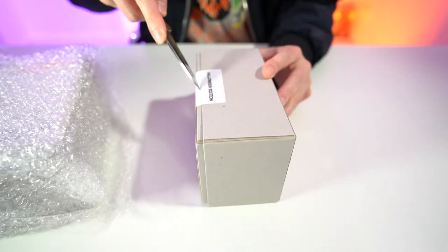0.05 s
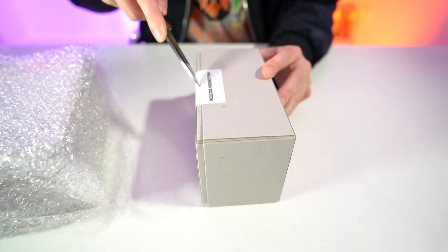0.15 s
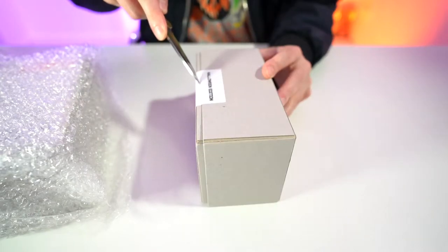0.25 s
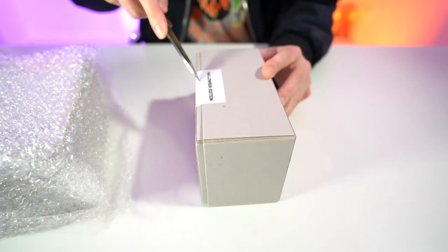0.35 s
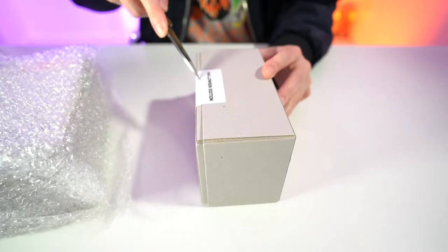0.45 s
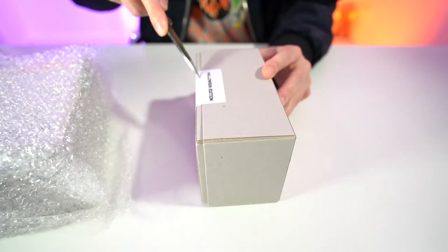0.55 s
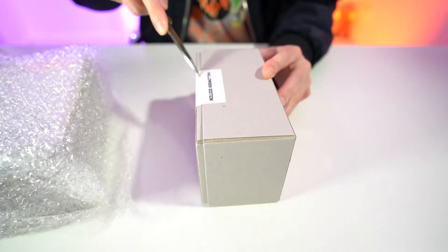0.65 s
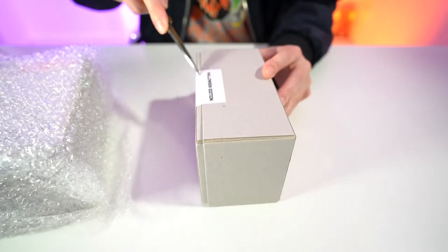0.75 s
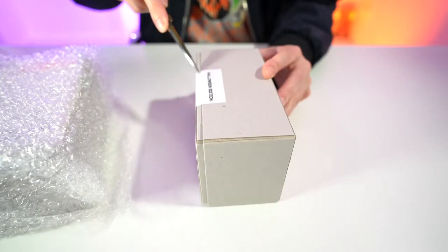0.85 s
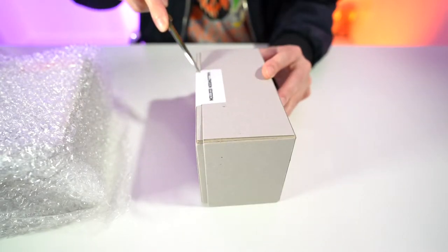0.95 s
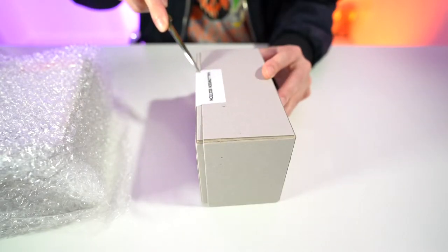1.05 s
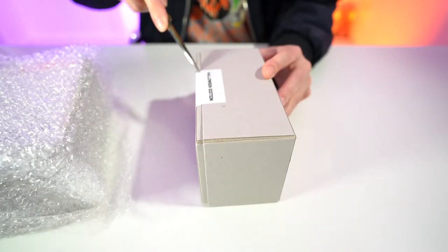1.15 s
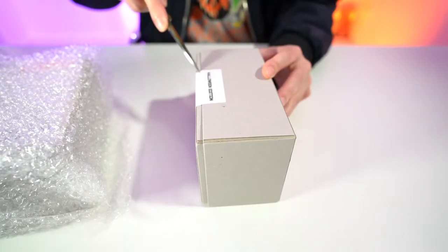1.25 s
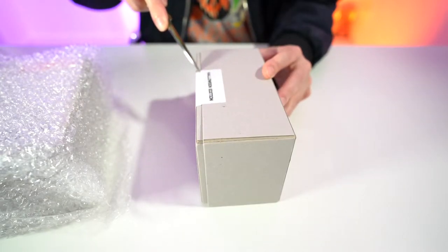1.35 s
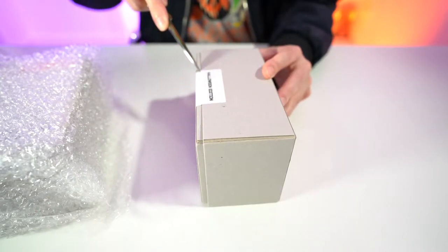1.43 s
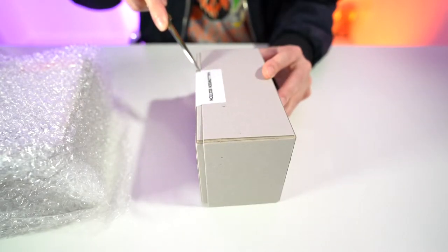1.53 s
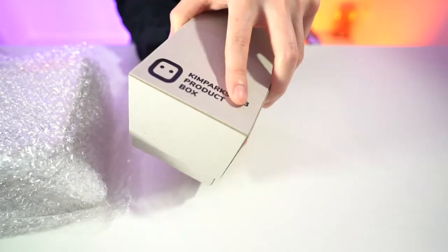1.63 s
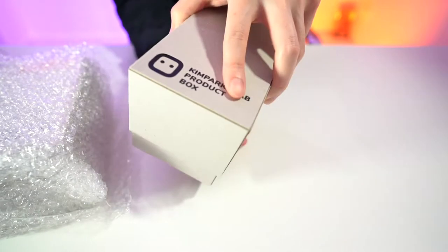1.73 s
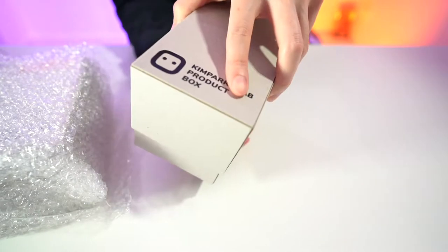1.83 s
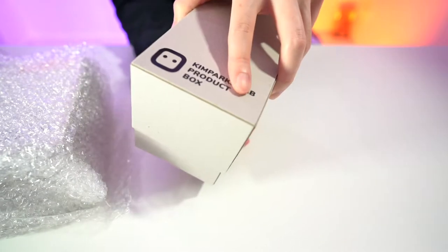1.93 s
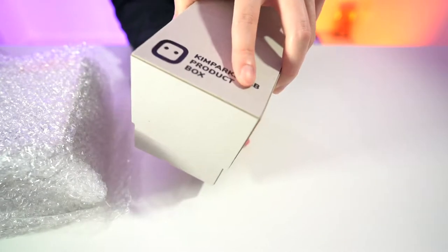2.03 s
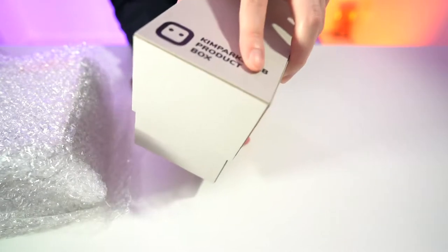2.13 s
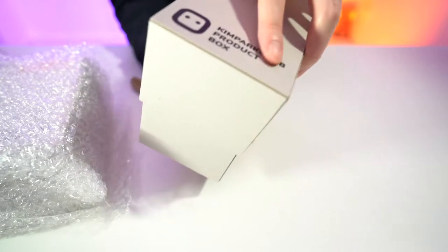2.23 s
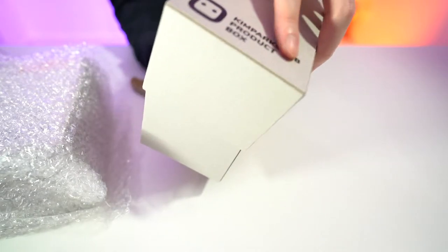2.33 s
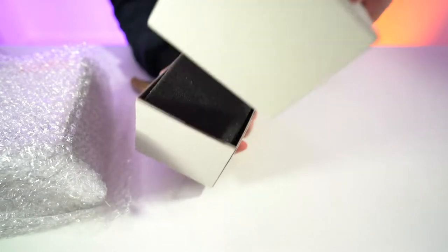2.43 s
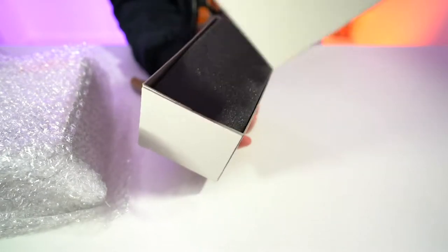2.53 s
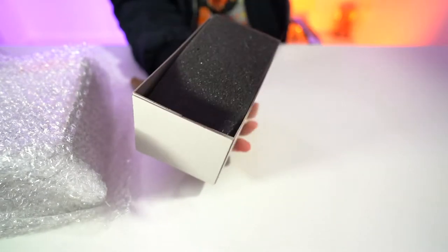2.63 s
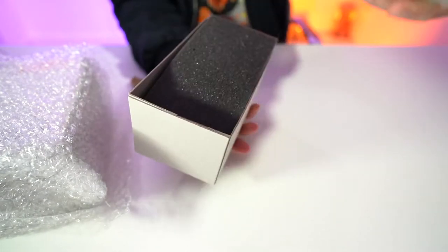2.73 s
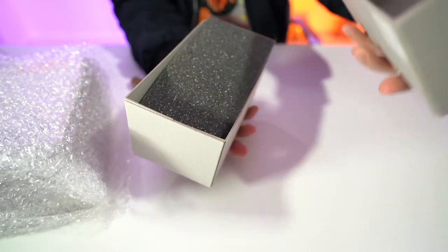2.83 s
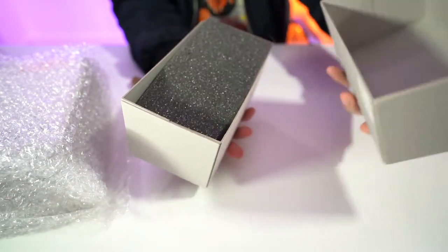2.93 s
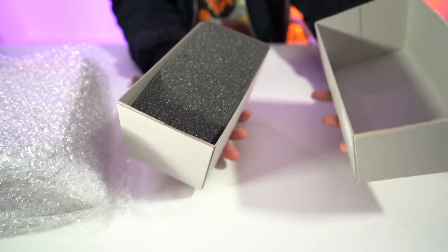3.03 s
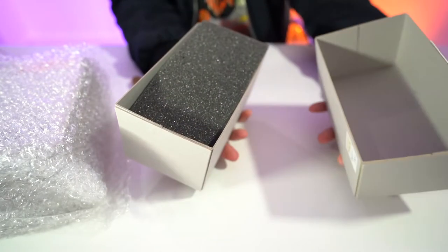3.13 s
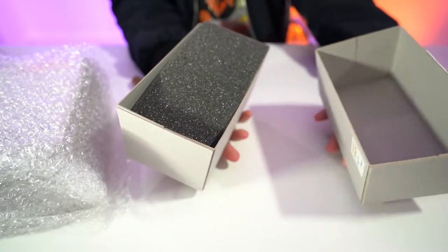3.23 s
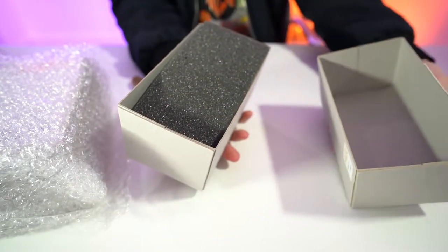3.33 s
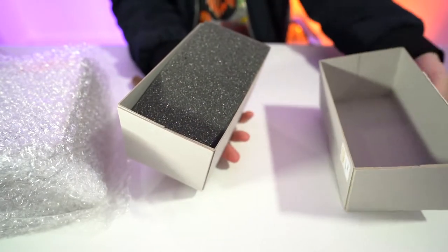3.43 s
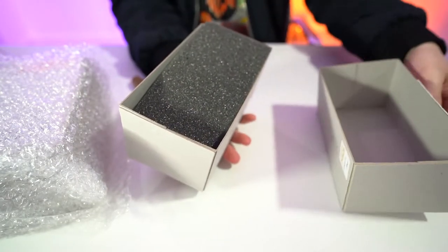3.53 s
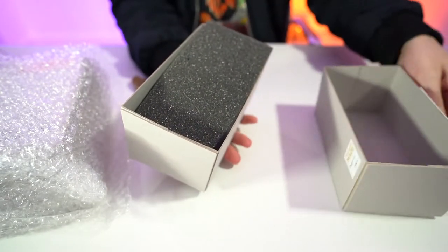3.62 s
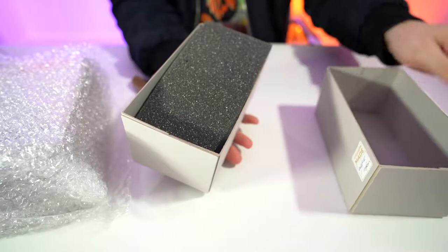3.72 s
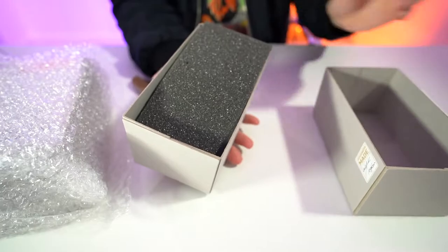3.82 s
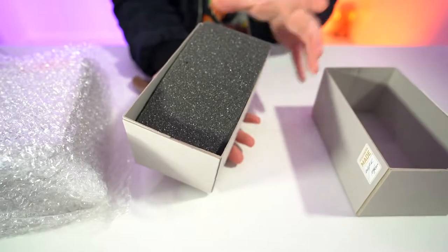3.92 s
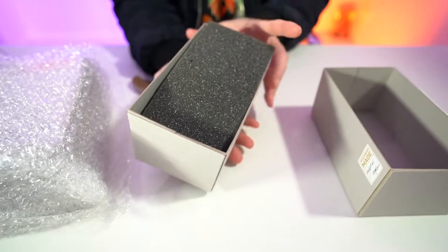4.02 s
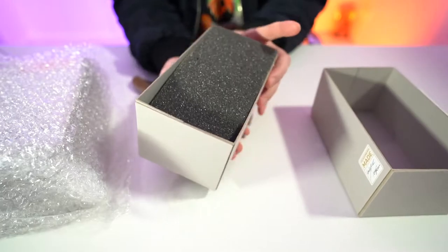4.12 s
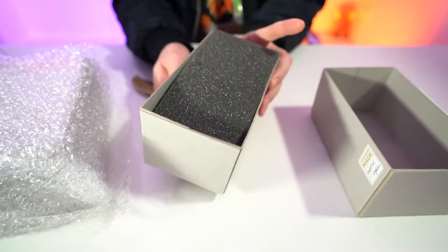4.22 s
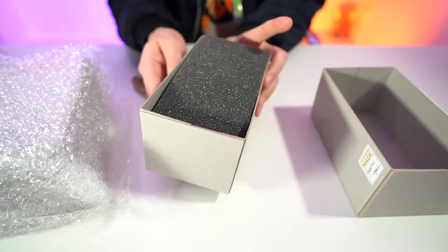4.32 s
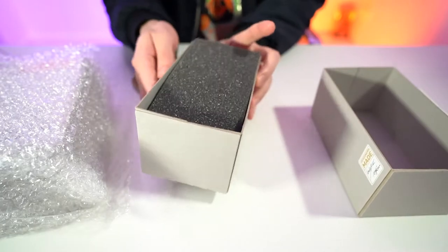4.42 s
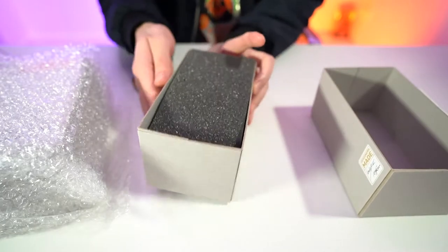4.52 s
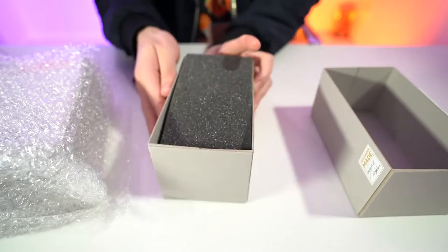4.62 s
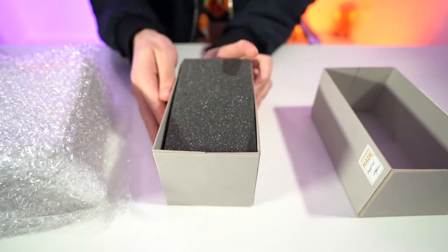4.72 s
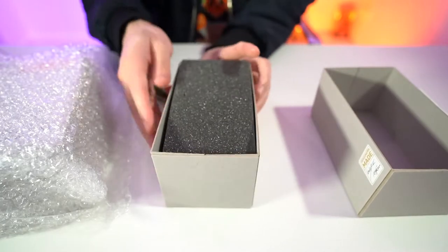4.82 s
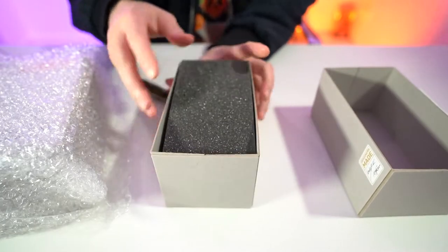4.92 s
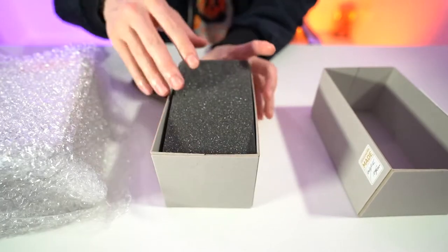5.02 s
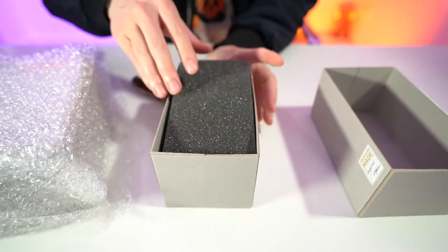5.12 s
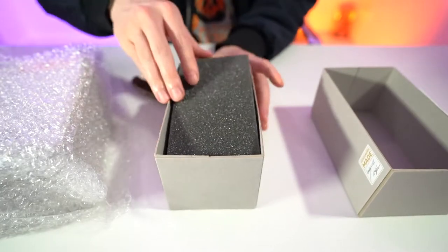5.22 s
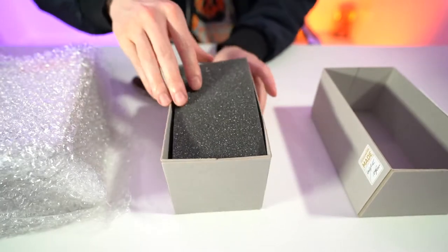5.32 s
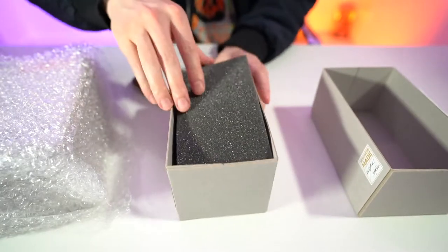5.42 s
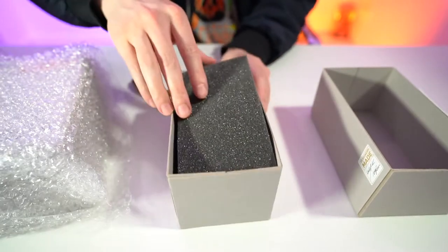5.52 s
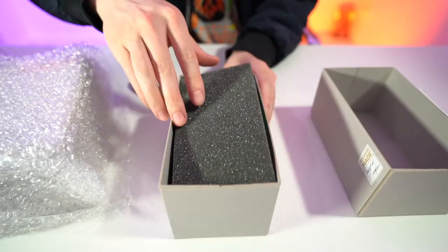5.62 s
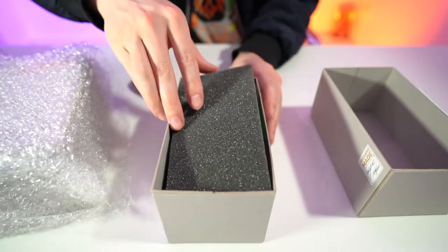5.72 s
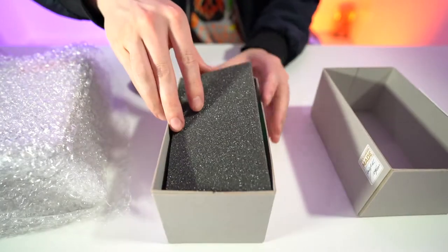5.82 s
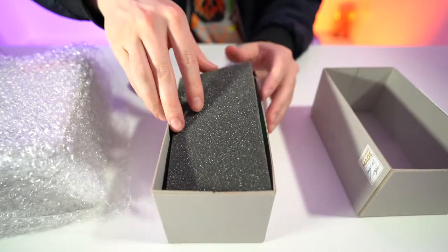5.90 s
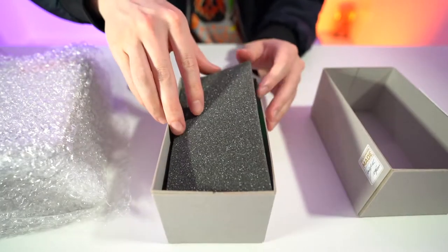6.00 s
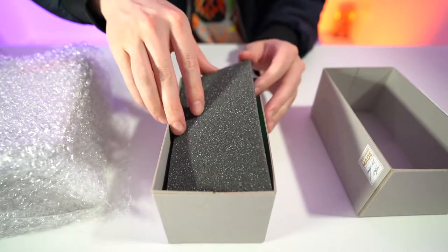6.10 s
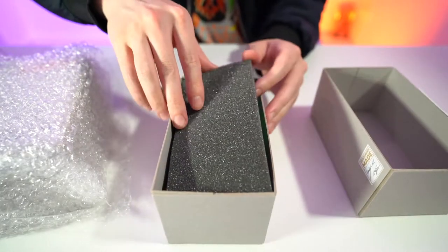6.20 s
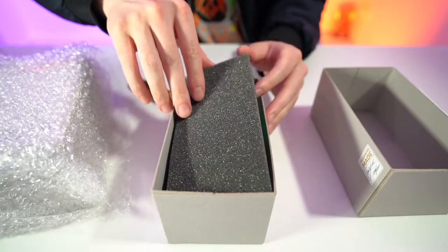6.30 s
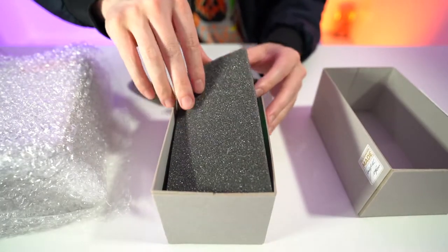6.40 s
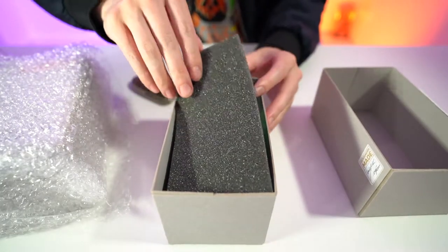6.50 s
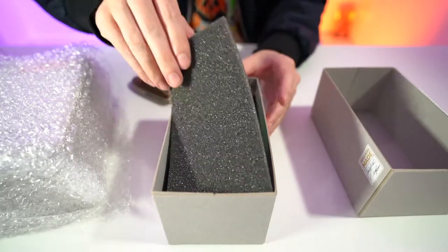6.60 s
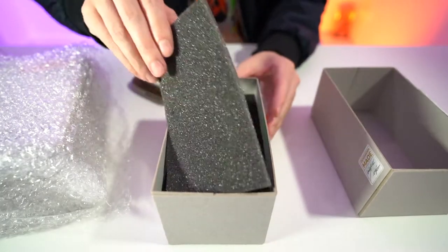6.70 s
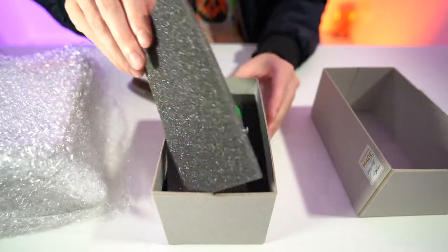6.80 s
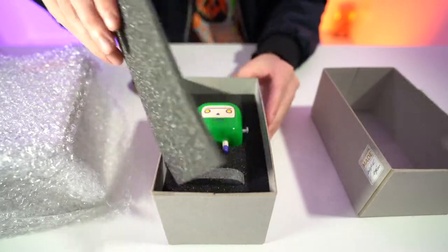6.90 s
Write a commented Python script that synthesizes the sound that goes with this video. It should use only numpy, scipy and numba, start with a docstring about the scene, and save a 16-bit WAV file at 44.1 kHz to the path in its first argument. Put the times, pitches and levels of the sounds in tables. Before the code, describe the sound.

Close indoor unboxing: faint crisp paper tearing, hollow lid scrape, bouncing cardboard knocks, box thud, soft finger strokes and gritty foam rubbing.

```python
"""First a blade slits a paper seal: uneven bursts of tiny slips, with ringing notes and sharp snaps.
Then the tight lid of a small cardboard box slides off and is set down with a few bounces; the box is put down.
Fingers and a foam sheet rub the walls: streams of random slips, split into pitch bands, shake the card.
Knocks are fading sine waves at the card's own notes, creaks are narrow bands of noise.
Under it all lie faint room noise and slow air pressure that rocks the capsule below hearing."""
import sys
import numpy as np
from scipy import signal
from scipy.fft import rfft, irfft, next_fast_len
from scipy.io import wavfile
from scipy.ndimage import uniform_filter1d
from numba import njit

SR = 44100
rng = np.random.default_rng(int(sys.argv[2]) if len(sys.argv) > 2 else 0)


def unload_wav(signal):
    """Save mono or channel-first audio to the path in sys.argv[1] as 16-bit WAV at rate SR, clipped to [-1, 1]."""
    wavfile.write(
        sys.argv[1],
        SR,
        np.round(np.clip(np.atleast_2d(signal).T, -1, 1) * 32767).astype(np.int16),
    )


def voltage_ratio(level):
    """Linear amplitude factor for a level in decibels (scalar or array-like)."""
    return 10 ** (np.asarray(level, float) / 20)


N = 306698
TIME = np.arange(N) / SR


def columns(table):
    """A soft gate, open within the table's time span, and each column drawn out to every sample."""
    s, *rest = np.transpose(table)
    inside = uniform_filter1d(1. * (TIME >= s[0]) * (TIME <= s[-1]), size=400)
    return inside, [np.interp(TIME, s, c) for c in rest]


def unit(x):
    """Scale to an rms of 1."""
    return x / np.sqrt(np.mean(x ** 2))


def colour(x, table):
    """Filter by (f/Hz, level/dB) points joined by straight lines on a log frequency axis."""
    size = next_fast_len(len(x))
    hz, db = np.transpose(table)
    at = np.log(np.maximum(np.arange(size // 2 + 1) * SR / size, 1))
    gain = voltage_ratio(np.interp(at, np.log(hz), db))
    return irfft(rfft(x, size) * gain, size)[:len(x)]


@njit
def svf(x, hz, width, sr):
    """Band-pass whose centre may move, with a gain of 1 there."""
    y, b, l = np.empty(len(x)), 0., 0.
    for i in range(len(x)):
        g, k = np.tan(np.pi * hz[i] / sr), width / hz[i]
        v = (b + g * (x[i] - l)) / (1 + g * (g + k))
        b, l, y[i] = 2 * v - b, l + 2 * g * v, k * v
    return y


def band(x, hz, width_hz):
    """Band-pass at a fixed or moving centre."""
    return svf(x, hz + np.zeros(len(x)), 1. * width_hz, 1. * SR)


def walk(rate):
    """A smooth random wander: levels held 1 / rate s, then averaged twice; spread near 1."""
    hold = int(SR / rate)
    steps = np.repeat(rng.standard_normal(N // 50), hold)[:N]
    return 1.17 * uniform_filter1d(uniform_filter1d(steps, hold), hold)


def grains(rate, spread_db):
    """Tiny slips at random moments, rate per second, most small and a few large."""
    chance = rng.random((3, N))
    size = voltage_ratio(-spread_db * np.log(1 - chance[1])) * np.sign(chance[2] - .5)
    return unit((chance[0] < rate / SR) * np.minimum(size, 6.))


def add(out, s, x):
    """Mix x into out from second s on."""
    i = int(s * SR)
    out[i:i + len(x)] += x[:N - i]


def drone(force, modes, widen):
    """Steady friction shakes the card's modes; the pressing hand sets how wide they are."""
    return unit(sum(voltage_ratio(db) * band(force, hz, widen * 1.34 / t60) * np.sqrt(t60) for hz, db, t60 in modes))


# pull of the blade through the seal: columns [t/s, level/dB]
BLADE_PULL = [(0.0, -56), (0.09, -51.5), (0.228, -52), (0.434, -53), (0.454, -58.5), (0.528, -51.5),
              (0.562, -59.5), (0.688, -55.5), (0.935, -56), (0.955, -64), (1.0, -71)]
# the blade's ring climbs as it digs in, then sags: columns [t/s, f/Hz]
BLADE_RING = [(0.0, 3800), (0.15, 3800), (0.43, 4340), (0.56, 4310), (1.0, 4130)]
# colour of tearing paper: columns [f/Hz, level/dB]
TEAR_COLOUR = [(700, -2), (1200, -3.5), (3000, -4), (6000, -4), (8300, 1.5), (10300, -7.5), (11500, -1),
               (13000, -2), (16000, -8)]
# single paper fibres and glue spots snapping: columns [t/s, level/dB at the start, before colouring]
SNAPS = [(0.021, -30), (0.17, -27), (0.282, -29.5), (0.4204, -26), (0.437, -41), (0.5328, -36),
         (0.5779, -34), (0.615, -35), (0.630, -37), (0.654, -35), (0.6966, -34), (0.732, -37),
         (0.7465, -32), (0.7905, -33), (0.901, -44), (0.917, -31), (0.938, -36.5), (1.0075, -41.5),
         (1.3044, -33.5), (1.359, -29.5), (1.367, -35), (1.3723, -33), (5.1736, -44), (5.193, -37)]
# modes of the box's card, also used for rubbing and knocks: columns [f/Hz, level/dB, time to fall 60 dB/s]
BOX_MODES = [(146, -45, 0.014), (194, -3.5, 0.054), (308, 8.5, 0.054), (353, 6, 0.15), (417, 1.4, 0.17),
             (445, -11, 0.42), (588, 14, 0.035), (669, -4.5, 0.3), (695, -12, 0.23), (844, -3.5, 0.15),
             (970.6, 0.5, 0.16), (1065, -15, 0.66), (1177, 8.5, 0.04), (1680, -20, 0.023)]
# what the shut lid lets out, also used for the lid's slide: columns [f/Hz, level/dB]
SHUT_LID = [(100, 15), (300, 7), (650, 5.5), (800, -6.5), (1200, -19.5)]


def slit():
    """Fibres tear in uneven bursts, single ones snap; blade and paper flap ring, the closed box drones."""
    inside, (cut_db,) = columns(BLADE_PULL)
    _, (ring_hz,) = columns(BLADE_RING)
    # the ring weakens steeply below its highest pitch
    ring_db = cut_db - 1 + 40 * np.log2(ring_hz / ring_hz.max())
    drone_db, flap_db, flap_hz = cut_db + 7, cut_db - 1.5, .45 * ring_hz
    bursts = voltage_ratio(2.6 * walk(90))
    fine = bursts * grains(7000, 2.)
    coarse = bursts * grains(1100, 2.8)
    tear = unit(colour(fine + voltage_ratio(-4) * coarse, TEAR_COLOUR)) * voltage_ratio(cut_db)
    ring = unit(band(coarse + voltage_ratio(-3) * fine, ring_hz, 260)) * voltage_ratio(ring_db)
    flap = unit(band(fine + voltage_ratio(-0.5) * coarse, flap_hz, 310)) * voltage_ratio(flap_db)
    # the shut lid lets mainly the low wall modes out
    body = unit(colour(drone(fine, BOX_MODES, 3.15), SHUT_LID)) * voltage_ratio(drone_db)
    jolts = np.zeros(N)
    # sixteen small snaps at random moments join the listed ones
    small_snaps = [(s, -37) for s in rng.uniform(0, .94, 16)]
    for s, snap_db in SNAPS + small_snaps:
        add(jolts, s, voltage_ratio(snap_db) * rng.standard_normal(200) * np.exp(-TIME[:200] / .0007))
    snaps = colour(jolts, TEAR_COLOUR) + voltage_ratio(2.5) * band(jolts, ring_hz, 770)
    return inside * (tear + ring + flap + body) + snaps


# slow air pressure at the capsule: columns [t/s, level/dB]
SWAY = [(0.0, -30), (1.05, -32.5), (1.3, -27), (1.68, -35.5), (2.24, -36.5), (2.5, -22), (3.44, -45),
        (3.6, -25), (3.87, -41.5), (4.78, -28), (5.19, -34.5), (6.95, -35)]
# colour of the still room: columns [f/Hz, relative level/dB per Hz]
ROOM = [(45, 10), (70, -2), (200, -11), (400, -16.5), (900, -14.5), (2500, -28.5), (8000, -27.5),
        (16000, -28.5)]


def air():
    """Slow pressure swings near 15 Hz, one gust as the lid comes free, and the faint noise of the room."""
    _, (sway_db,) = columns(SWAY)
    sway = colour(rng.standard_normal(N), [(2, -28), (6, -7), (15, 8.0), (19, -4.5), (28, -25.0),
                                           (50, -43), (200, -90)])
    # the swings keep a fairly even size
    swing_size = np.sqrt(uniform_filter1d(sway ** 2, SR // 8))
    sway = unit(sway / (swing_size + 0.33 * sway.std())) * voltage_ratio(sway_db)
    t = TIME[:SR // 2]
    gust_s, gust_db, gust_hz, gust_t60_s = 2.463, -17, 21, .4
    gust = np.sin(2 * np.pi * gust_hz * t) * (1 - np.exp(-t / 0.006)) * 1000. ** (-t / gust_t60_s)
    add(sway, gust_s, voltage_ratio(gust_db) * gust)
    room = unit(colour(rng.standard_normal(N), [(32, -73)] + ROOM))
    return sway + room * voltage_ratio(-58 + 0.55 * walk(3.42))


def strokes(rows, drone_db, hiss_db, lean):
    """Power of scrape, hiss and wall drone: each stroke starts fast, swells to its peak, sags and dies out."""
    sag_db, attack_s, release_s = 9, .004, .014
    out = np.zeros((3, N))
    for s, length, db, place, bright_db in rows:
        t = TIME[:int((length + 4 * release_s) * SR)]
        shape_db = np.interp(t / length, [0, np.clip(place, .02, .98), 1], [-sag_db, 0, -sag_db])
        fade = np.exp(-np.maximum(t - length, 0) / min(release_s, length / 2))
        edges = np.minimum(t / attack_s, 1) * fade
        # lean: drone lost per dB of brightness
        for layer, over_db in zip(out, (0, hiss_db + bright_db, drone_db - lean * bright_db)):
            add(layer, s, (edges * voltage_ratio(db + over_db + shape_db)) ** 2)
    return out


# the three stroke tables share columns [t/s, length/s, peak level/dB, place of the peak 0-1, brightness/dB]
# firm contacts that shake the walls: blade tip on the lid, hand gripping the lid, lid skidding, box settling
PRESSES = [(.95, 1, -66.5, .3, -9), (1.005, 0.013, -60, 0.22, -5), (1.297, 0.031, -64, 0.069, -11),
           (1.35, 0.046, -57, 0.24, -4), (1.56, .04, -60.5, 0.23, -3), (2.8, 0.33, -72, 0.92, -5),
           (3.335, 0.1, -49, 0.066, 5), (3.663, 0.06, -38, 0.26, -3), (3.7, .09, -52.5, 0.19, -19),
           (4.635, 0.11, -53, 0.13, -6)]
# fingers stroking the card
FINGERS = [(2.42, 0.13, -55, 0, 1.5), (2.54, 1, -56.5, 0.23, 1.5), (2.71, 0.082, -57.5, 0, 0),
           (2.82, 0.09, -55, 0.52, 3), (3.18, 0.041, -53.5, 0.4, 2), (3.25, 0.39, -49, 0.56, 4.5),
           (3.503, 0.045, -38.5, 0.65, -1), (3.56, 0.071, -45, 0.46, 7.5), (3.62, 0.65, -56, 0.3, -0.5),
           (3.71, 0.015, -46, .4, -1), (4.065, 0.31, -48.5, 0.34, 4.5), (4.295, 0.021, -46, 0.5, 5),
           (4.32, 0.4, -53.5, 0.65, 2), (4.62, 0.1, -50, 0.5, 2), (4.72, 0.13, -51, 0.7, -0.5),
           (4.88, .25, -56.5, 0.38, -3)]
# the foam sheet stroking the card
FOAM = [(5.168, 0.049, -54.5, .15, -1), (5.19, 0.4, -52.5, 0.47, -2), (5.385, 0.13, -52.5, .15, -12),
        (5.5, 0.22, -46.5, 0.58, 0.5), (5.69, 0.36, -57, 0.35, 5), (6.032, 0.081, -49, 0.076, -9),
        (6.08, .38, -51, .6, 1.5), (6.167, 0.22, -48, 0, 5.5), (6.452, 0.095, -45.5, 0.2, -6),
        (6.537, 0.043, -39.5, 0.33, -2), (6.572, 0.051, -51, 0.7, 3), (6.642, .14, -45, 0.72, -4.5),
        (6.775, 0.14, -44, 0.63, -7)]
# the tight lid slides off: columns [t/s, speed as scrape level/dB, grip as wall drone over scrape/dB]
LID_SLIDE = [(1.615, -78, 5), (1.634, -51.5, 9), (1.69, -45, 1.5), (1.8, -52, 8), (1.875, -55, 8),
             (1.9, -47.5, 7.5), (2.05, -42, -4), (2.2, -43, -1), (2.3, -40.5, -6.5), (2.405, -37.5, -3),
             (2.418, -54, 5), (2.45, -62, 10)]


def contact():
    """Levels in dB of scrape, hiss over scrape, wall drone and table rumble from all that touches the card."""
    inside, (speed_db, grip_db) = columns(LID_SLIDE)
    # a faster slide hisses more
    hiss_db = -5.5 + .5 * (speed_db - speed_db.max())
    power = inside * voltage_ratio([speed_db, speed_db + hiss_db, speed_db + grip_db]) ** 2
    power = power + strokes(FINGERS, drone_db=-18.5, hiss_db=-5, lean=0.16)
    power = power + strokes(FOAM, drone_db=-8, hiss_db=-5, lean=0.2)
    power = power + strokes(PRESSES, drone_db=6.7, hiss_db=-9.5, lean=0.47)
    # holding hands are never quite still
    held_db = -81.5
    scrape, hiss, walls = power + voltage_ratio([[held_db], [held_db - 20], [held_db + 14]]) ** 2
    rumble = walls * voltage_ratio(-5) ** 2 + voltage_ratio(-64) ** 2
    return 10 * np.log10([scrape, hiss / scrape, walls, rumble])


# modes of the lid's card, also used for its knocks: columns [f/Hz, level/dB, time to fall 60 dB/s]
LID_MODES = [(36.7, -16.5, 1), (104.1, -9.5, 0.42), (222, 6, 0.16), (295.3, 0.5, 0.23), (327, 2.5, 0.13),
             (394, 3, 0.25), (440.6, -5.5, 0.27), (479, 9, 0.063), (560, 9, 0.093), (682, -5.5, 0.25),
             (780, -13.5, 0.61), (906, 9.5, 0.04), (1090, -23, 0.033), (1244, -10, 0.18),
             (1490, -11, 0.083), (1800, -36, .08), (2340, -38, .12)]
# colour of scraping card: columns [f/Hz, level/dB per half octave]
CARD = [(64, -10.5), (180, -5.5), (350, -7), (600, -6), (1000, -8), (2000, -7.5), (4000, -9), (8000, -4),
        (11000, -17), (15000, -2.5)]


def rubbing():
    """Dense slips heard in half octaves; low ones follow table and walls, high ones the fine hiss."""
    scrape_db, hiss_db, drone_db, rumble_db = contact()
    force = voltage_ratio(1.6 * walk(30)) * grains(9000, 1.6)
    # the lid is in the hand between these times; before, it sits on the box
    lift_s, release_s = 2.45, 3.9
    held = (TIME > lift_s) * (TIME < release_s)
    shut_walls = voltage_ratio(-7) * unit(colour(drone(force, BOX_MODES, 2.1), SHUT_LID))
    walls = np.where(held, 0.16 * drone(force, LID_MODES[2:], 4.8), 0.25 * drone(force, BOX_MODES, 0.77))
    out = np.where(TIME < lift_s, shut_walls, walls) * voltage_ratio(drone_db)
    card_hz, card_db = np.transpose(CARD)
    step = np.sqrt(2)
    for hz in 64 * step ** np.arange(17):
        # how far this band follows the table, the walls and the hiss
        deep = np.clip(np.log2(230 / hz) / 0.25, 0, 1)
        low = np.clip(np.log2(1600 / hz) / 3.02, 0, 1) - deep
        high = np.clip(np.log2(hz / 4200) / 1.1, 0, 1.6)
        db = deep * rumble_db + low * drone_db + (1 - low - deep) * scrape_db + high * hiss_db
        part = colour(force, [(hz / 2, -60), (hz / step, -12), (hz, 0), (hz * step, -12), (hz * 2, -60)])
        flicker_db = 1.6 * walk(20)
        tone_db = np.interp(np.log(hz), np.log(card_hz), card_db)
        out = out + voltage_ratio(db + tone_db + flicker_db) * unit(part)
    # the foam sheet scrapes out of the box: its cells pop in thin bright grit
    grit = colour(grains(700, 2.5), [(800, -14), (3000, -6), (9000, -10), (12000, 0), (16000, 0)])
    foam_out_s = 6.45
    return out + (TIME > foam_out_s) * voltage_ratio(scrape_db) * unit(grit)


def knocks(events, modes, contact_ms):
    """A short soft push rings the modes, the high ones more near an edge, with a slap of the contact."""
    out, t = np.zeros(N), TIME[:SR // 2, None]
    hz, db, t60 = np.transpose(modes)
    for s, peak_db, edge_db, damping, slap_db in events:
        # every blow lands on another spot of the mode shapes
        spot = rng.standard_normal((2, len(hz)))
        gain = voltage_ratio(db + edge_db * np.log2(np.maximum(hz, 200) / 400) + 1.5 * spot[0])
        # neighbouring modes start in opposite directions; the hand detunes them a little
        swing = (-1.) ** np.arange(len(hz)) * np.sin(2 * np.pi * hz * (1 + .012 * spot[1]) * t)
        ring = (gain * swing * 1000. ** (-t * damping / t60)).sum(axis=1)
        # the push is strongest after a quarter of the contact time
        rise = t[:300, 0] * 4000 / contact_ms
        push = rise * np.exp(-rise)
        ring = np.convolve(ring, push)[:len(t)]
        # a click and fading noise make the slap
        crush = (rng.standard_normal(len(t)) + 12 * (t[:, 0] == 0)) * np.exp(-t[:, 0] / .003)
        slap = band(band(crush, 1150., 1500.), 1150., 1500.)
        blow = ring / np.abs(ring).max() + voltage_ratio(slap_db) * slap / np.abs(slap).max()
        # each blow begins 2 ms after its listed time
        add(out, s + .002, voltage_ratio(peak_db) * blow)
    return out


# blows on the box: columns [t/s, peak level/dB, nearness to an edge/dB per octave, damping factor,
# slap over ring level/dB]
BOX_KNOCKS = [(1.634, -42, -10, 1.2, -6), (2.372, -14.5, 6, 2.4, -15), (2.379, -26, 19, 3.2, -18),
              (2.717, -43, -2, 1.6, 4), (3.123, -43, -1, 0.9, 6), (4.068, -37.5, 6, 2.1, 9.5),
              (4.299, -33.5, 8, 3, 3.5), (4.635, -8, 1.2, 1.67, -23), (4.661, -15.5, -.5, 2, -17),
              (5.195, -36.5, 1.5, 1.7, -5), (5.621, -30, 3, 1.05, -2), (6.551, -21, 5.5, 1.46, -2.5)]


def box_knocks():
    """The box is knocked and put down, and its card modes ring."""
    return knocks(BOX_KNOCKS, BOX_MODES, contact_ms=0.56)


# short creaks: columns [t/s, length/s, f/Hz, level/dB]
CREAKS = [(2.711, 0.033, 823, -46), (2.77, 0.027, 870, -49), (2.772, 0.017, 3320, -53),
          (3.122, 0.014, 745, -45.5), (3.2, 0.017, 3600, -53), (5.621, 0.014, 840, -37),
          (6.03, 0.047, 2000, -51), (6.031, 0.081, 3100, -53), (6.032, 0.077, 4700, -52),
          (6.28, .14, 930, -52), (6.453, 0.086, 2070, -49), (6.455, 0.033, 636, -44),
          (6.682, 0.074, 680, -48), (6.815, 0.061, 2040, -47), (6.825, 0.08, 1300, -45)]


def creaks():
    """A surface sticks and sings: narrow rough notes, quick to start."""
    out = np.zeros(N)
    for s, length, hz, db in CREAKS:
        t = TIME[:int(length * SR)] / length
        note = unit(band(rng.standard_normal(len(t)), hz, hz / 14))
        add(out, s, voltage_ratio(db) * note * np.sin(np.pi * t ** .4))
    return out


# blows of the lid: columns [t/s, peak level/dB, nearness to an edge/dB per octave, damping factor,
# slap over ring level/dB]
LID_KNOCKS = [(3.296, -27.5, -10.5, 1, -15), (3.332, -5.5, -3.5, 1.09, -13.5), (3.532, -9, 0, 0.87, -9.5),
              (3.547, -11, 0, 1.2, -8), (3.57, -20.5, -2, 1.8, -10), (3.662, -33, 8, 1, -13),
              (3.676, -10, 4, 6.3, -25), (3.695, -11, 6, 2.1, -25), (3.719, -21.5, -5, 0.64, -14),
              (3.74, -13, 6.5, 1.86, -24), (3.748, -26, -18, 1.7, -1)]


def lid_knocks():
    """The lid is set down with a few bounces, and its card modes ring."""
    return knocks(LID_KNOCKS, LID_MODES, contact_ms=0.66)


def room_tail(near):
    """Echoes blur into noise that starts after 4 ms, dies away and is duller than the sound itself."""
    t = TIME[:SR // 2]
    t60_s, level_db = 0.5, -21
    tail = colour(rng.standard_normal(len(t)), [(100, 0), (2310, -3), (16000, -15)])
    tail = tail * 1000. ** (-t / t60_s) * (t > .004)
    return voltage_ratio(level_db) * signal.fftconvolve(near, tail / np.sqrt(np.sum(tail ** 2)))[:N]


def scene():
    """Near sounds with a short dull room tail, over the air."""
    near = slit() + rubbing() + box_knocks() + creaks() + lid_knocks()
    return (near + room_tail(near) + air())[None]


def low_pass(x):
    """Removes everything above the highest recorded frequency."""
    return signal.sosfilt(signal.butter(12, 15830, fs=SR, output="sos"), x)


# colour of the microphone: columns [f/Hz, level/dB]
MIC = [(100, -0.5), (4500, -3.5), (6300, -6.5), (8500, -1), (10300, -6), (12500, -5), (15500, -8.5)]


def record(dry):
    """The microphone's uneven response colours the scene."""
    mix = colour(dry[0], MIC)[None]
    return low_pass(mix)


dry = scene()
out = record(dry)
unload_wav(out)
```